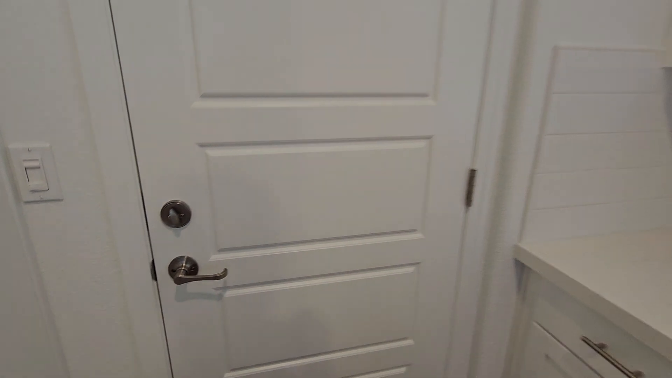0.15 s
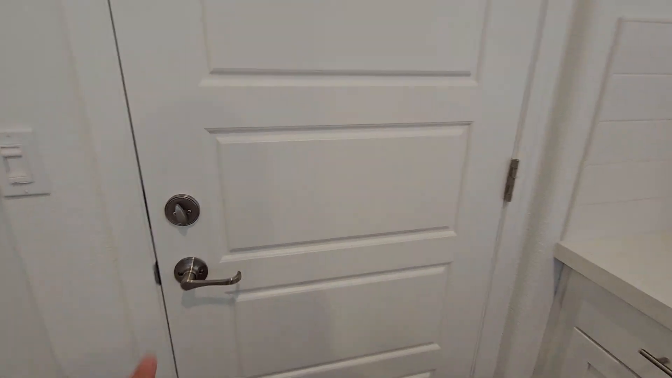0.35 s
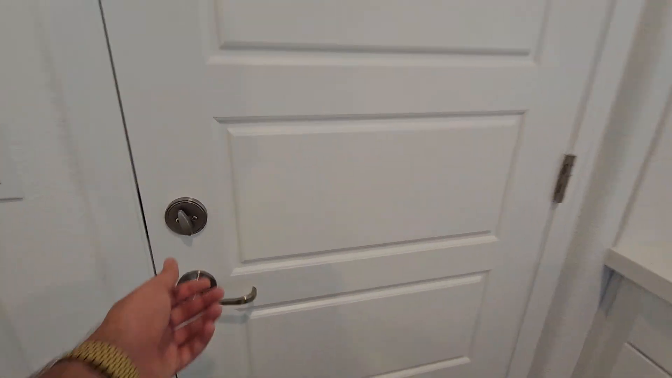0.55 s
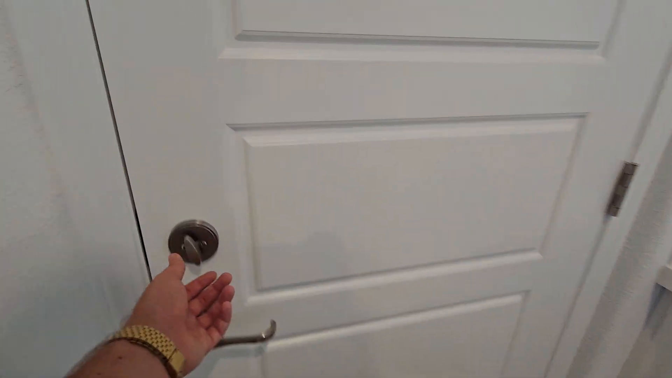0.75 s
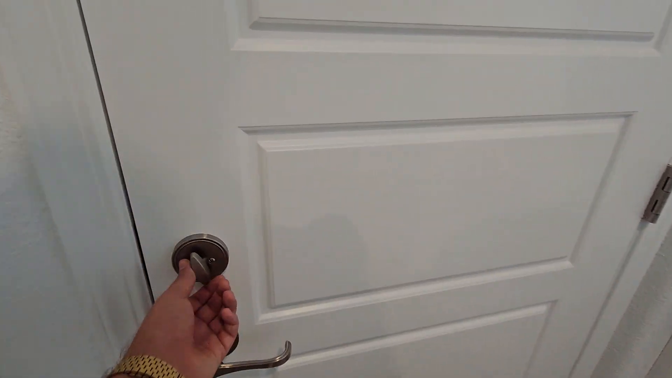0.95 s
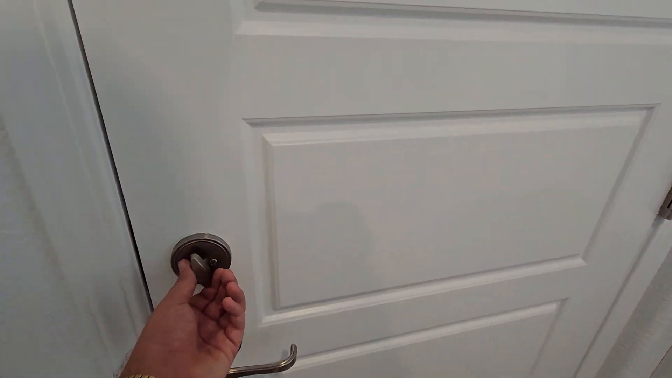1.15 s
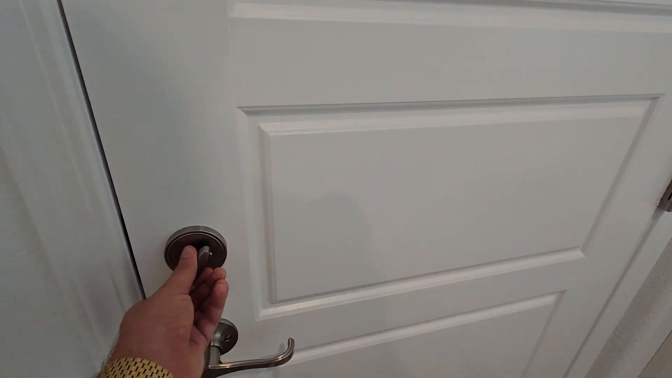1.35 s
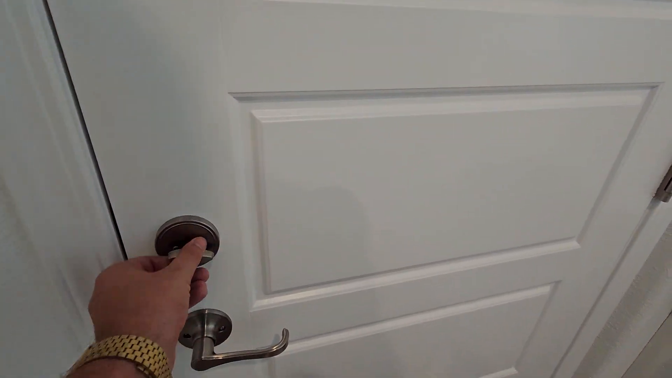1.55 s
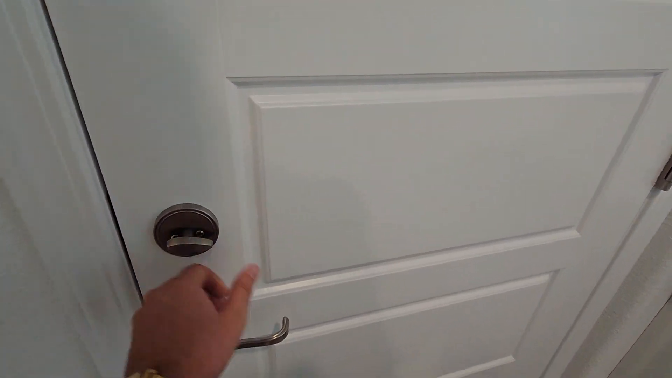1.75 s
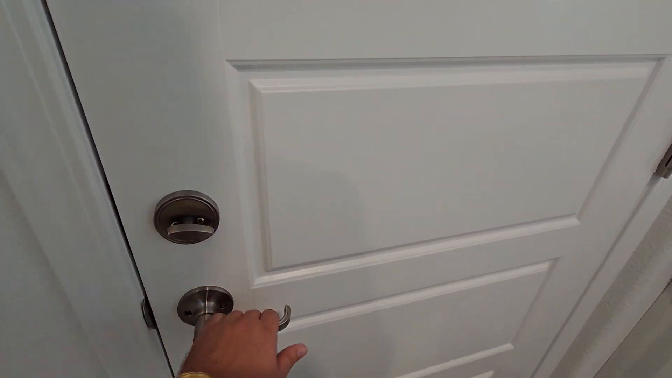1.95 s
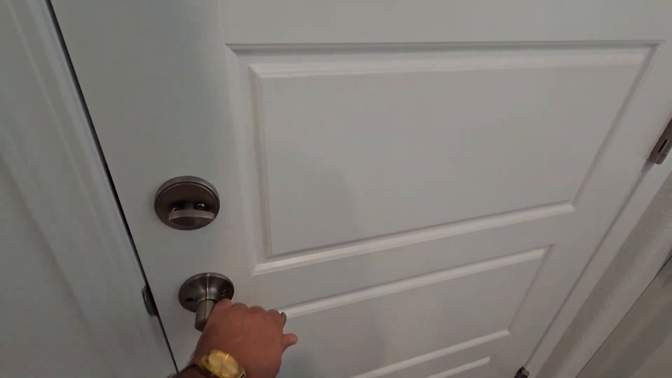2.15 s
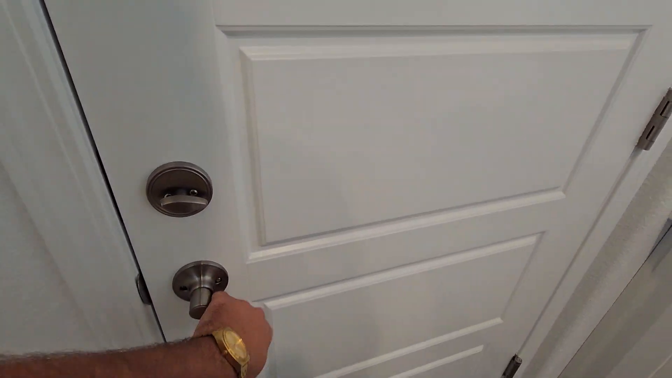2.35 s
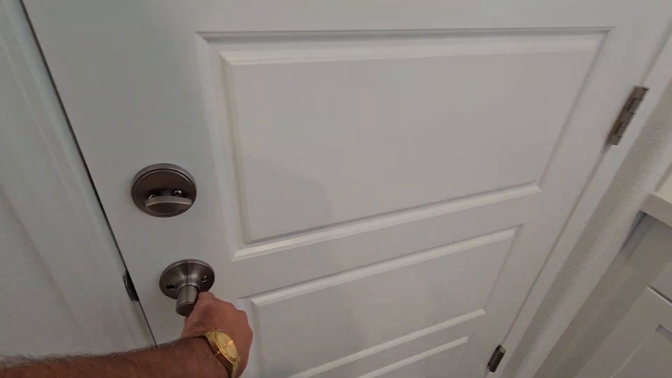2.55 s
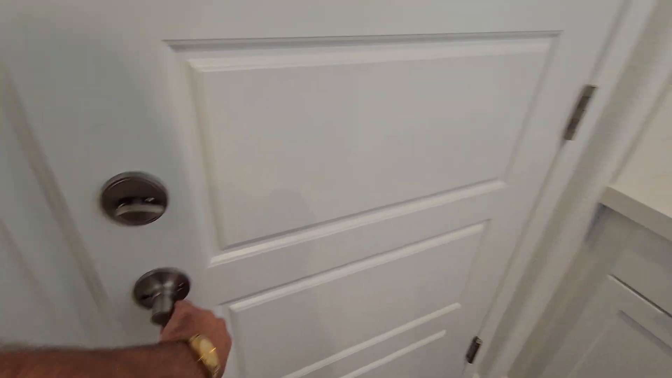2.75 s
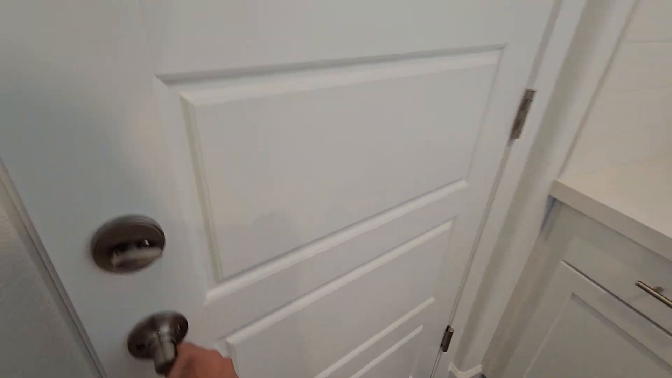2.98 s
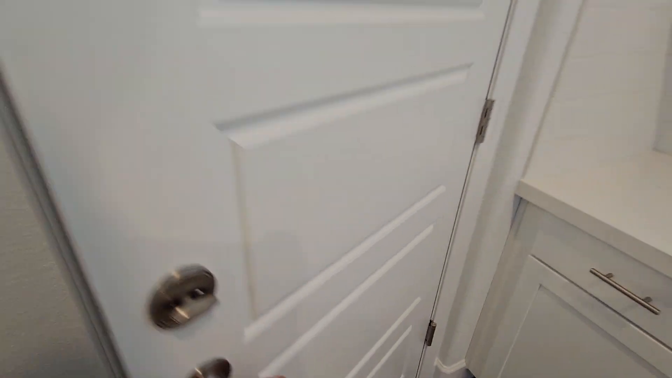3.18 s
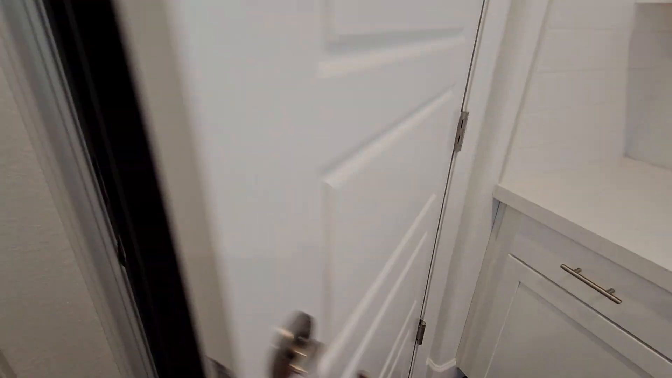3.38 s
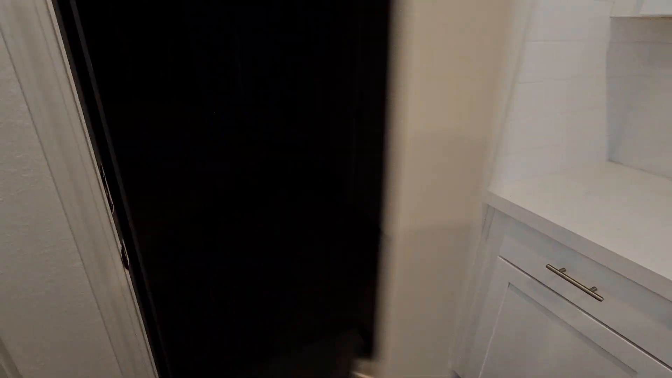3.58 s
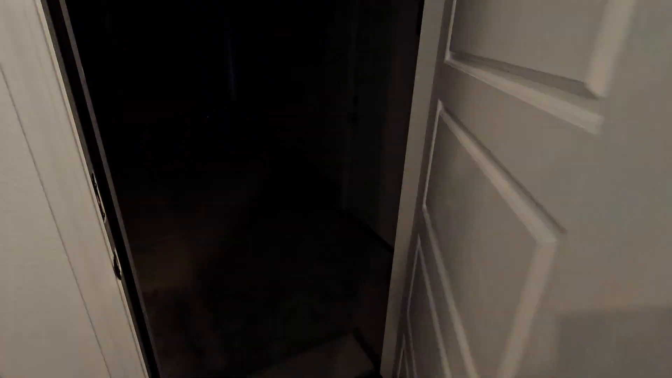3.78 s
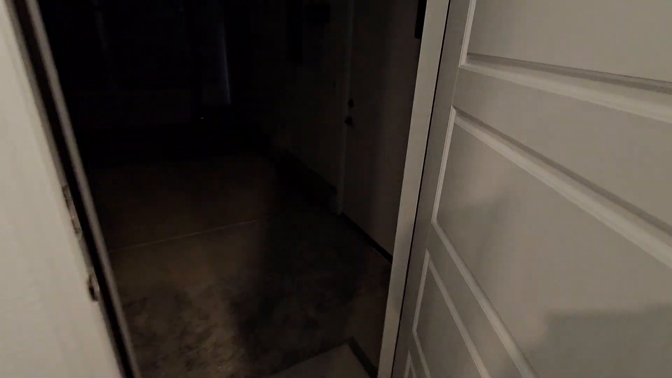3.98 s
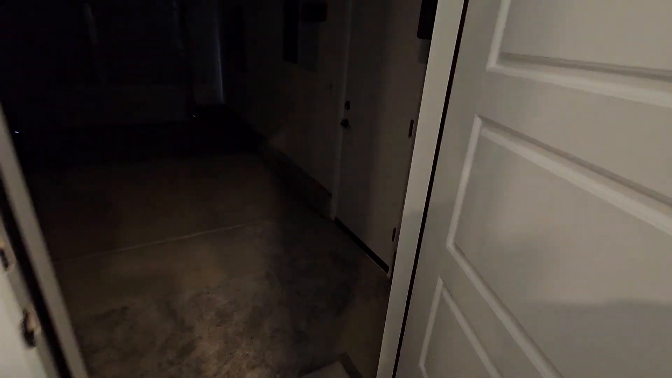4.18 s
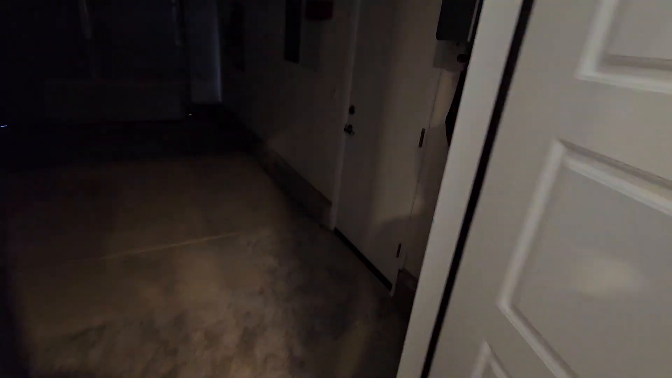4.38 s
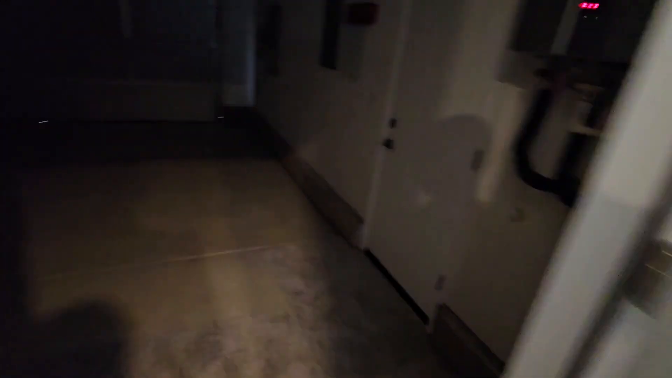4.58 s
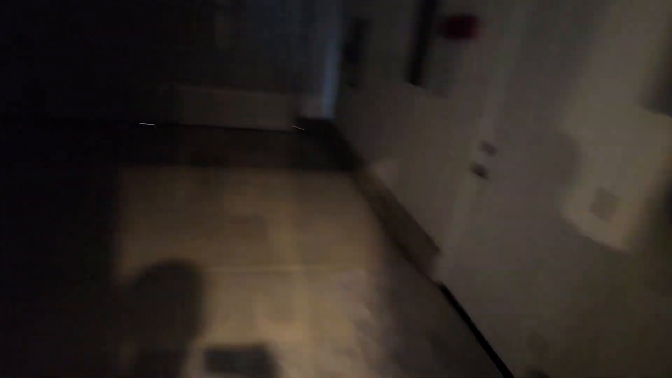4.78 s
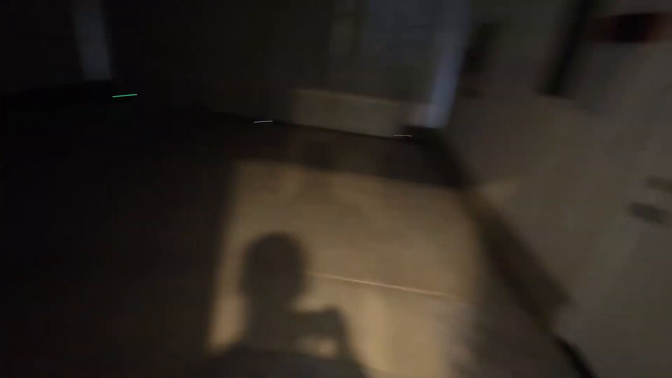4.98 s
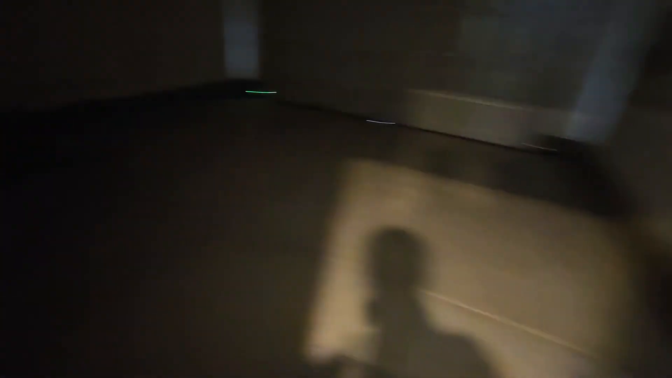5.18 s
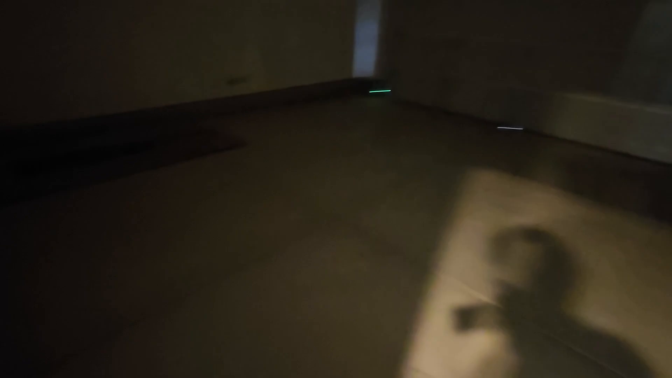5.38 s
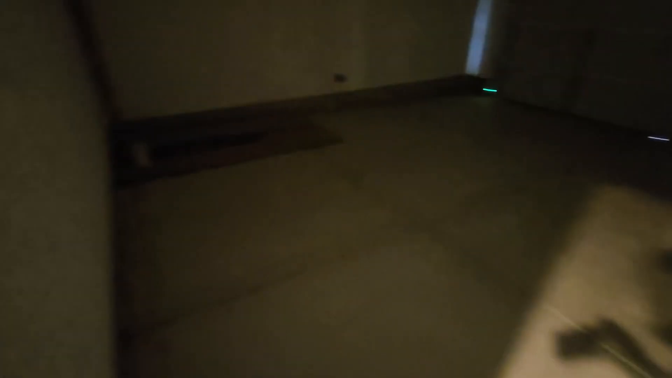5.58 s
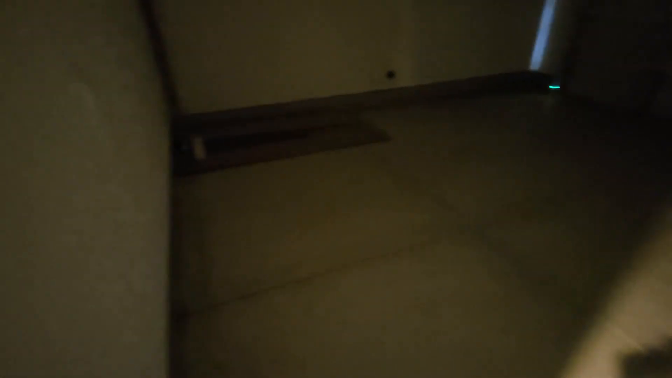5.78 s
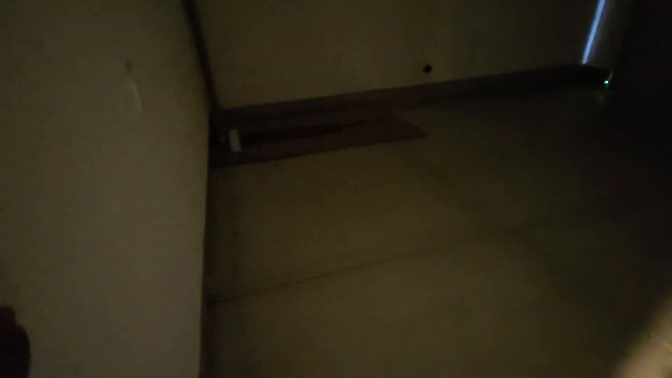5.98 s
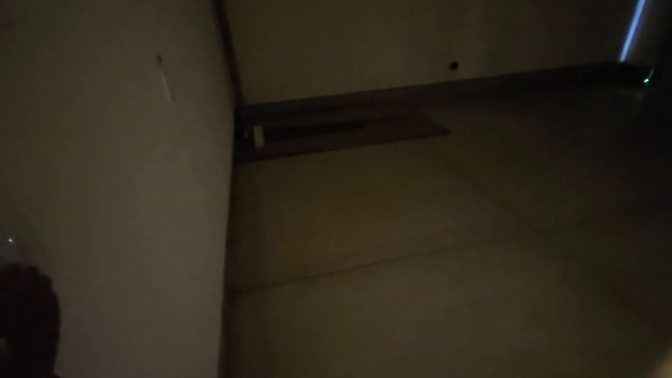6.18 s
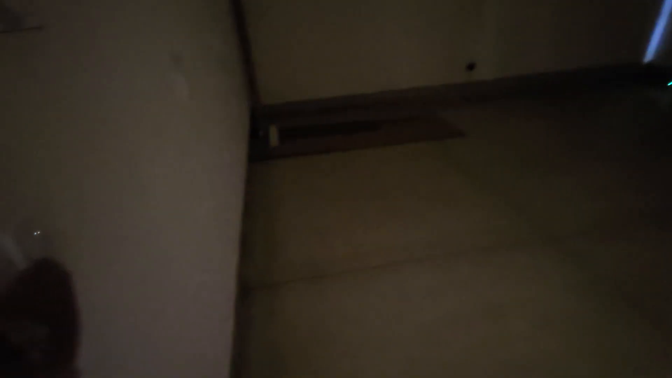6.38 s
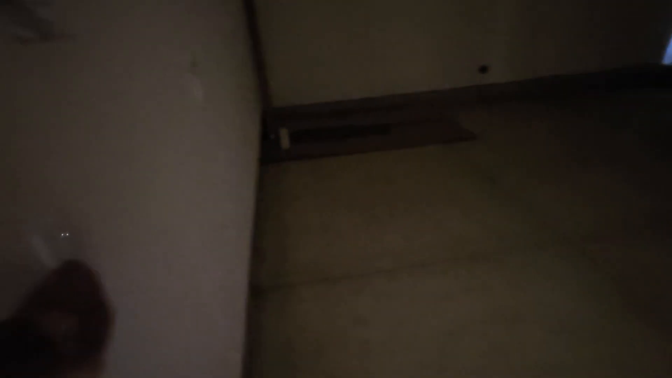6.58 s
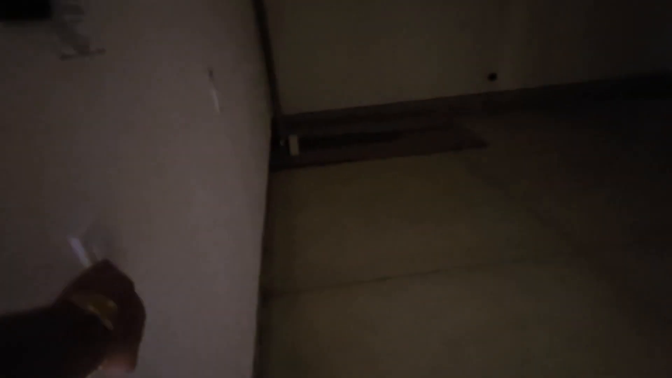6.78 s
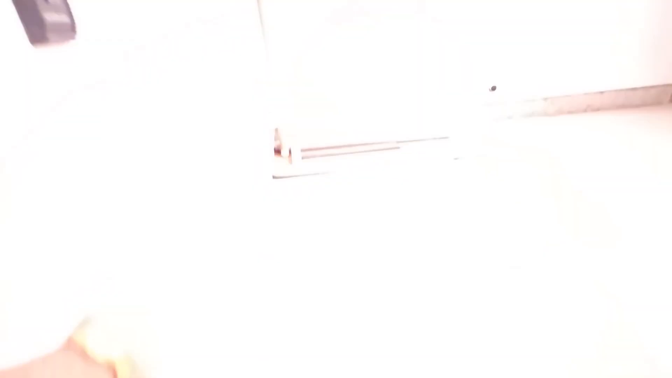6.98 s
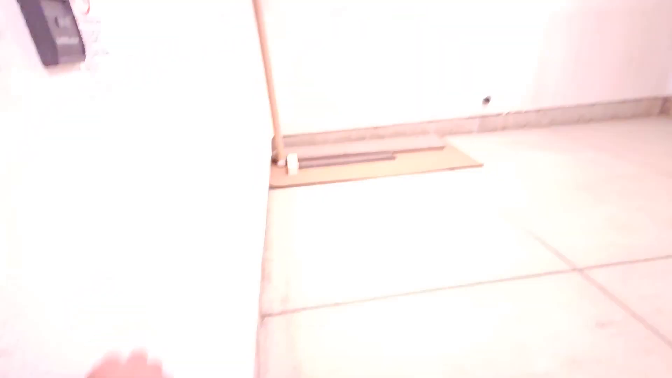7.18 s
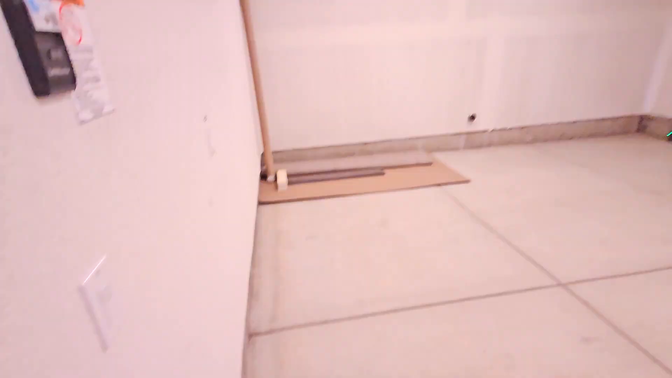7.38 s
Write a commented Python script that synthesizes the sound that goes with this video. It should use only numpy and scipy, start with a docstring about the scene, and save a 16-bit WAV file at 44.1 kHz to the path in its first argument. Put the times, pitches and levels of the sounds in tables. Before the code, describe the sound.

Close, first-person sound in a quiet house with low rumble and mains hum. A hand faintly brushes a lock, the deadbolt rattles and snaps over, then a lever handle clunks down with a woody thud. The door pulls away with a hissing, dragging rub and small latch clicks. Soft steps and cloth swishes lead into a bare, hard-walled garage, ending with small plastic light switch clicks.

```python
"""First a hand brushes a lock over a low house rumble, hum and still air; then a deadbolt turns, a lever pulls the
latch, the door drags off its seal, and someone walks into a bare garage and flicks a light switch.
Metal and plastic contacts are noise bursts plus struck modes, shaded by a head and answered by diffuse hard walls.
Thuds are short low sine swings; brushing, cloth and seal are patchy coloured noise under drawn envelopes;
the background is coloured noise with a steady sine for the hum."""
import sys
import numpy as np
from scipy import signal
from scipy.fft import rfft, irfft, next_fast_len
from scipy.io import wavfile
from scipy.ndimage import uniform_filter1d

SR = 44100
rng = np.random.default_rng(int(sys.argv[2]) if len(sys.argv) > 2 else 0)


def persist_wave(psi):
    """Save psi, clipped to +-1, as 16-bit WAV."""
    counts = np.round(np.clip(psi, -1, 1) * 32767).astype(np.int16)
    wavfile.write(sys.argv[1], SR, np.atleast_2d(counts).T)


N = 328015

# metal contacts of bolt, lever and latch: (time [s], level [dB], centre [Hz], relative treble [dB],
# relative body [dB], decay t60 [s], left-right offset [dB])
LOCK_CONTACTS = [(1.2212, -28.5, 2040, -30.5, -7, 0.14, 3), (1.2275, -17, 1840, -26.5, -20, 0.14, -6),
                 (1.2357, -19.5, 1920, -22, -12.5, 0.092, -2), (1.3694, -36, 1952, -25.5, -9, 0.15, -6),
                 (1.4587, -32.5, 1848, -21.5, -12, 0.069, -6.5), (1.516, -22, 2500, -35, -20, .09, -5),
                 (1.5779, -14, 4100, -10, -21.5, .11, -1.5), (1.5836, 0, 2050, -21.5, -17, 0.095, -1),
                 (2.1986, -32, 2000, -31.5, -3, .06, -2), (2.2776, -34, 2036, -33, -13.5, 0.15, -3.5),
                 (2.3585, -32.5, 2010, -23.5, -6.5, 0.13, -3.5),
                 (2.4069, -16.5, 1930, -8, -2.5, 0.097, 3.5), (2.4276, -3, 2940, -14, -19.5, 0.1, -3),
                 (2.4455, -17.5, 3900, -23, -17.5, 0.074, -6), (2.6879, -24, 1500, -20, 3.5, .06, -2.5),
                 (2.7143, -10.5, 3600, -28, -18, 0.085, -4.5), (2.7286, -19, 4300, -29, -1.5, 0.032, -9.5),
                 (3.0014, -34, 4450, -22, -6, .2, -3.5), (3.2288, -20.5, 2900, -11.5, -15, 0.083, -3.5),
                 (3.3478, -32, 2120, -23, -15, .068, -5), (3.4062, -29.5, 4540, -33, -5.5, .12, 3.5),
                 (3.4116, -23.5, 2030, -24, -16, 0.11, -11), (3.4439, -23.5, 2570, -19, -5.5, 0.089, -4.5)]
# colour of a metal burst: (frequency [Hz], relative level [dB per Hz])
METAL_BURST = [(590, -47), (1000, -10), (1390, -4), (1600, -8), (2050, -10.5), (2350, -13.5), (3510, -10),
               (6090, -13.5), (7260, -6), (9960, -25), (11300, -11.5), (15400, -18), (16500, -26)]
# ringing lock parts: (frequency [Hz], relative level [dB], decay t60 [s])
STEEL_MODES = [(1220, -6.5, 0.09), (1398, -9, 0.082), (1612, 2, 0.12), (1810, -4, 0.18), (1952, -2, .12),
               (2160, -4, .12), (2287, -2.5, .12), (2420, -2, 0.21), (2564, -9, .1), (2870, -6, .1),
               (4222, -6, 0.07), (7500, -14.5, .04)]


def lock():
    """Bolt, lever and latch: metal hits excite steel modes and knock the door leaf."""
    return contacts(LOCK_CONTACTS, METAL_BURST, STEEL_MODES, ring_db=-18.0, build=0.0017, boom_db=3.5,
                    slack=.002, width=1.25, rise=.0025, wet_db=-31, panel_db=-10)


# small ticks, the light switch last: (time [s], level [dB], centre [Hz], relative treble [dB],
# relative body [dB], decay t60 [s], left-right offset [dB])
TICK_CONTACTS = [(0.6195, -42.5, 3330, -7, -4, 0.008, -19), (0.6612, -51.5, 3140, -3, -10, 0.015, -14),
                 (4.2173, -49, 2920, -20.5, -4, 0.053, -7), (4.4794, -60, 700, -30, 12, .04, -3),
                 (4.5875, -44.5, 2800, -9, -10, .02, -20), (6.465, -56, 4000, -10, -20, .018, -7),
                 (6.4898, -54, 3080, -40, -10, 0.019, -10), (6.542, -24, 2280, -53, -16.5, 0.038, -6),
                 (6.7328, -28, 3760, -54, -6, 0.042, -5), (6.8437, -30, 4270, -36, -11.5, .039, -5),
                 (6.9105, -22.5, 4700, -8.5, -17.5, 0.033, -5.5)]
# colour of a tick's burst: (frequency [Hz], relative level [dB per Hz])
PLASTIC_BURST = [(590, -26.5), (1000, -6.5), (1180, -18.5), (2120, -3.5), (2380, -5.5), (3900, -10),
                 (5110, -7.5), (10300, -29), (12000, -10.5), (13800, -13), (16500, -45)]
# plastic switch plate: (frequency [Hz], relative level [dB], decay t60 [s])
PLATE_MODES = [(743, 8, .05), (2500, -3.5, 0.0094), (3590, 1, .02), (4880, -5.5, 0.0091), (5700, 1, 0.013)]


def ticks():
    """Small ticks and the light switch: bursts excite the short, damped modes of a plastic plate."""
    return contacts(TICK_CONTACTS, PLASTIC_BURST, PLATE_MODES, ring_db=-14.5, build=0.025, boom_db=17.0,
                    slack=0.019, width=1.6, rise=0.00084, wet_db=-36, panel_db=-20)


# door leaf: (frequency [Hz], relative level [dB], decay t60 [s])
PANEL_MODES = [(255.8, -1.5, .2), (329, -10.5, 0.036), (398, -6, 0.31), (461, -4, 0.29), (518, -3, .22),
               (597, -7, 0.13), (761, -21.5, 0.1), (932, -11, .1)]
# the head's shading of near sounds: (frequency [Hz], left-right difference [dB])
HEAD_SHADE = [(100, -2.5), (640, 5.5), (1410, 2.5), (3100, -3), (6000, -5), (9000, 6), (15000, 7.5)]
EAR_LAG = 17  # samples by which the right ear is late
ROOM_SHRINKS = 0.25  # dB of room share lost per dB of a harder, more direct contact


def contacts(rows, spectrum, tuning, ring_db, build, boom_db, slack, width, rise, wet_db, panel_db):
    """Each contact: a noise burst, ringing modes, a knock into the body, then the walls."""
    out = np.zeros((2, N))
    t = np.arange(SR // 4) / SR
    woody = lambda hz: np.exp(-np.log(hz / 600 + 1e-9) ** 2 / 0.78)
    high = lambda hz: amp(along(spectrum, hz)) * (hz > 8500)
    for s, db, centre_hz, treble_db, body_db, t60, pan_db in rows:
        # each contact's modes sit at a slightly different, randomly drawn pitch
        modes = np.array(tuning) * [1 + slack * rng.standard_normal(), 1, 1]
        # each part favours its own range
        hump = lambda hz: amp(-6 * (np.log2(hz / centre_hz + 1e-9) / width) ** 2)
        tone = lambda hz: amp(along(spectrum, hz)) * hump(hz)

        shape = (1 - np.exp(-t / max(rise, 1e-4))) * amp(-60 * t / max(t60, .005))
        shape = shape + 0.55 * amp(-60 * t / 0.0056)  # the first touch cracks
        noise = rng.standard_normal((3, len(t)))
        burst = unit(filtered(noise, tone)) * shape
        treble = unit(filtered(noise, high)) * shape * amp(-60 * t / 0.072)  # treble dies first
        burst += amp(treble_db + 5) * treble

        body = unit(filtered(noise[0], woody))
        knock = amp(body_db - 2.0) * (0.8 * body * shape + amp(panel_db) * ringing(PANEL_MODES, t))
        ring = filtered(ringing(modes, t) * np.sqrt(shape), hump)
        core = 0.072 * burst[0] + amp(ring_db) * ring

        # the head delays and shades one ear and scatters a part
        scatter = 0.33 * burst[1:]
        ears = two_ears(core, EAR_LAG) + scatter + two_ears(knock, EAR_LAG // 2)
        ears = filtered(ears, lambda hz: balance(along(HEAD_SHADE, hz) + pan_db))
        add(out, amp(db) * ears, s)

        bright = lambda hz: tone(hz) * (1 + 3 * peaks(modes, hz)) + amp(treble_db + 13.5) * high(hz)
        wood = lambda hz: amp(body_db + boom_db) * woody(hz) * (1 + 3 * peaks(PANEL_MODES, hz))
        tail = walls(lambda hz: bright(hz) + wood(hz), build)
        # echoes are shaded less
        tail = filtered(tail, lambda hz: balance(0.13 * (along(HEAD_SHADE, hz) + pan_db)))
        add(out, amp(wet_db + db * (1 - ROOM_SHRINKS)) * tail, s)
    return out


def ringing(modes, t):
    """A set of decaying sine modes, struck at new strengths and phases."""
    out = 0
    for hz, db, t60 in modes:
        strength, phase = rng.standard_normal(2)
        out = out + amp(db + 2 * strength - 60 * t / t60) * np.sin(2 * np.pi * hz * t + 2 * phase)
    return out


def peaks(modes, hz):
    """The size of the modes' resonant answer at each frequency."""
    return sum(amp(db) / np.abs(1 + 1j * (hz - c) * t60) for c, db, t60 in modes)


def two_ears(sound, lag):
    """The same sound at the left ear and, lag samples later, at the right."""
    return np.array([sound, np.pad(sound, (lag, 0))[:len(sound)]])


# how long the hard walls ring: (frequency [Hz], decay t60 [s])
WALL_DECAY = [(200, 1.7), (1000, 1.49), (3000, 1.58), (7000, 0.97), (11000, 0.59)]
# colour the walls give back: (frequency [Hz], relative level [dB])
WALL_COLOUR = [(200, -5.5), (800, -4), (1500, -3.5), (7000, 3), (9000, -5), (16000, -6.5)]


def walls(tone, build):
    """A fresh diffuse tail of the given colour; each frequency dies at its own speed."""
    hz, t, z = signal.stft(rng.standard_normal((2, 3 * SR // 2)), SR, nperseg=256)
    # long waves reach both ears alike
    z[1] = np.where(hz[:, None] < 600, 0.78 * z[0] + 0.19 * z[1], z[1])
    swell = 1 - np.exp(-t / build)  # echoes take a moment to build
    fall = amp(along(WALL_COLOUR, hz)[:, None] - 60 * t / along(WALL_DECAY, hz)[:, None])
    tail = filtered(signal.istft(z * swell * fall, SR, nperseg=256)[1], tone)
    return tail / np.std(tail[:, :SR // 10])


# soft blows on door and floor: (time [s], level [dB], pitch [Hz])
BLOWS = [(1.572, -32, 149), (1.999, -40, 73.4), (2.19, -31, 62), (2.385, -26, 270), (2.402, -10.5, 145.3),
         (2.457, -14, 63.3), (2.499, -20.5, 29), (2.583, -23, 42), (2.592, -26, 140), (2.679, -31, 211),
         (2.719, -24, 26.2), (3, -36, 44.6), (3.25, -36, 36.6), (3.289, -36, 45.4), (4.022, -30, 45),
         (4.128, -35.5, 73.2), (4.196, -29, 72.7), (4.222, -30, 70), (4.359, -35, 46.4), (4.395, -38, 130),
         (4.468, -28.5, 65.4), (4.5, -29, 72), (4.676, -39.5, 66), (5.039, -35, 50), (5.126, -37, 75),
         (5.208, -37, 58.7), (5.341, -47, 51.1), (5.897, -40.5, 45.3)]
# which side low sounds favour, also used by the house: (time [s], left-right difference [dB])
LOW_LEAN = [(0, 1), (2.9, .5), (3.9, 2.5), (4.5, 5), (5.2, 1.5), (5.5, 1), (7.44, 0)]
THUD_T60_S, THUD_RISE_S = .18, .006


def thuds():
    """Soft blows: a short low sine swing at its own pitch."""
    out = np.zeros((2, N))
    t = np.arange(SR // 2) / SR
    for s, db, hz in BLOWS:
        turn = 2 * np.pi * hz * t + [[.15], [-.15]]  # the ears differ a little in phase
        swing = np.sin(turn) * (1 - np.exp(-t / THUD_RISE_S)) * amp(-60 * t / THUD_T60_S)
        lean = balance(np.interp(s, *np.transpose(LOW_LEAN)))
        add(out, amp(db) * lean * swing, s - .004)  # starts early to leave room for the rise
    return out


# strokes of a hand reaching for the lock: (peak time [s], peak level [dB], 20 dB rise [s], 20 dB fall [s]);
# the sign of a rise or fall is ignored
HAND_STROKES = [(0.0, -67.5, .02, .5), (.25, -74.5, -0.1, .25), (.42, -73, .04, .8), (.6, -74, 0.25, .03),
                (.92, -54.5, .22, .22), (1.07, -69, -0.1, .2)]
# swishes of cloth and soles while walking: (peak time [s], peak level [dB], 20 dB rise [s], 20 dB fall [s])
WALK_STROKES = [(4.251, -70.5, 0.022, 0.14), (4.437, -64, .11, 0.43), (4.58, -64, 0.084, 0.14),
                (4.85, -72, 0.13, 0.91), (5.066, -55, 0.08, 0.4), (5.284, -61, 0.17, 0.27),
                (5.472, -58.5, 0.1, 0.33), (5.686, -62, 0.18, 0.17), (5.937, -62, 0.042, 0.32)]
# lever and seal rubbing: (time [s], hiss level [dB], fizz level [dB], drag level [dB])
SEAL_LEVELS = [(1.97, -70, -95, -62), (2.05, -60, -92, -53), (2.13, -62, -90, -66), (2.2, -52, -70, -46),
               (2.25, -62, -84, -51), (2.37, -52.5, -74, -49), (2.43, -37, -50, -33), (2.5, -39, -66, -43),
               (2.62, -41, -57, -44), (2.7, -42, -57, -44), (2.75, -41, -70, -38), (2.81, -49, -75, -46),
               (2.99, -52, -72, -56), (3.02, -50, -62, -44), (3.12, -49, -68, -47), (3.24, -52, -58, -51),
               (3.32, -53, -68, -54), (3.44, -56.5, -62, -51), (3.66, -61.5, -72, -59),
               (3.75, -71, -97, -60), (3.9, -76.5, -104, -66)]
# colours of hand on lock, cloth, seal hiss, top fizz and low drag: (frequency [Hz], relative level [dB per Hz])
SKIN_COLOUR = [(530, -48), (900, -17), (1450, -11.5), (1660, -20), (2650, -4.5), (2900, -6), (6480, -12),
               (7100, -9), (10000, -40.5), (13000, -56.5), (22000, -120)]
CLOTH_COLOUR = [(410, -46), (700, -3), (740, -13), (1150, -1.5), (1630, -1.5), (2660, -0.5), (4250, 0.5),
                (7000, -2.5), (8650, -23), (10000, -29), (13000, -43), (22000, -120)]
HISS_COLOUR = [(530, -27), (900, -4), (1370, -6.5), (3320, -3.5), (4250, -2.5), (7400, -11.5), (8730, -39),
               (10500, -55.5), (13600, -64.5), (22000, -120)]
FIZZ_COLOUR = [(5590, -39.5), (9500, -12), (11600, 3), (15100, -5), (15750, -8), (16000, -35), (16500, -46)]
DRAG_COLOUR = [(120, -59.5), (200, -5), (291, -2.5), (402, -5), (554, -2), (1020, -19.5), (1200, -25),
               (1560, -43), (2640, -120)]
SHEEN_DB, SHEEN_QUICKER = -10, 1.3  # treble of a stroke: level under it, and how much faster it comes and goes


def friction():
    """Rubbing as patchy noise: hand on lock, cloth and soles, and the seal's hiss, fizz and drag."""
    hiss, fizz, drag = curves(SEAL_LEVELS)
    hand = strokes(HAND_STROKES) * rush(SKIN_COLOUR, patchy_db=2.0)
    cloth = strokes(WALK_STROKES) * rush(CLOTH_COLOUR, patchy_db=1.3)
    seal = hiss * rush(HISS_COLOUR, patchy_db=1.8) + drag * rush(DRAG_COLOUR, patchy_db=3.0)
    sheen = amp(SHEEN_DB) * strokes(HAND_STROKES + WALK_STROKES, SHEEN_QUICKER)
    return hand + cloth + seal + (sheen + fizz) * rush(FIZZ_COLOUR, patchy_db=2.1)


def strokes(rows, quicker=1):
    """Each stroke swells to its peak and dies away, evenly in dB."""
    t = np.arange(N) / SR
    out = 0
    for s, db, rise, fall in rows:
        away = np.maximum((s - t) / abs(rise), (t - s) / abs(fall))
        out = out + amp(db - 20 * quicker * away)
    return out


# house and body movement: (time [s], level [dB])
RUMBLE_LEVEL = [(0, -53.5), (.74, -55.5), (1.62, -50), (1.99, -54), (2.24, -44), (2.6, -30.5), (2.78, -42),
                (3.09, -49), (3.19, -57.5), (3.56, -49.5), (3.75, -56.5), (4.2, -43.5), (4.62, -50.5),
                (5.05, -57.5), (5.22, -52.5), (5.59, -59.5), (5.94, -56.5), (7.44, -56)]
# mains hum: (time [s], level [dB])
HUM_LEVEL = [(0, -56), (.6, -50), (2.3, -48), (3.85, -57), (5.03, -53), (5.47, -52.5), (7.44, -54)]
# a narrow appliance whine: (time [s], level [dB])
WHINE_LEVEL = [(0, -77.5), (2, -80.5), (4, -74.5), (7.44, -87.5)]
# colours of deep rumble, upper rumble and still air: (frequency [Hz], relative level [dB per Hz])
DEEP_COLOUR = [(8.8, -34.5), (15, -10.5), (59, 6.5), (73, 0.5), (97, -19), (110, -1.5), (140, -23),
               (240, -120)]
LOW_COLOUR = [(65, -34.5), (110, 2.5), (145, 4.5), (239, -2), (274, -2), (413, -16), (643, -22), (700, -23),
              (910, -29), (1540, -120)]
AIR_COLOUR = [(210, -31), (350, -8.5), (446, 0), (625, -7), (1330, -8.5), (1470, -8), (2800, -15),
              (3140, -9), (3400, -13.5), (6480, -19.5), (8660, -60.5), (10200, -102), (11400, -26),
              (12500, -33), (15700, -32), (15950, -70)]
AIR_DB = -68
REST_DB = -55  # deep rumble at rest
LOW_DB, LOW_FOLLOWS = -55, 0.55  # the upper rumble: level at rest, dB per dB of movement
GARAGE_S, GARAGE_DB = 4.88, -6  # past the doorway the upper rumble is this much weaker


def house():
    """Noise rumble that moves in level, a sine mains hum, a thin noise whine and still air."""
    t = np.arange(N) / SR
    deep, = curves(RUMBLE_LEVEL)
    hum_level, = curves(HUM_LEVEL)
    whine_level, = curves(WHINE_LEVEL)
    doorway_db = GARAGE_DB * np.clip((t - GARAGE_S) / 0.4, 0, 1)
    low = amp(LOW_DB + doorway_db) * (deep / amp(REST_DB)) ** LOW_FOLLOWS
    rumble = deep * rush(DEEP_COLOUR, patchy_db=1.85) + low * rush(LOW_COLOUR, patchy_db=0.6)
    hum = hum_level * np.sin(2 * np.pi * 59.5 * t)
    lean = balance(np.interp(t, *np.transpose(LOW_LEAN)))
    whine = whine_level * rush([(2900, -50), (3130, 0), (3360, -50)], patchy_db=.4)
    air = amp(AIR_DB) * rush(AIR_COLOUR, patchy_db=.6)
    return (rumble + hum) * lean + whine + air


# how alike the two ears' noise is: (frequency [Hz], left-right correlation [-1 to 1])
EAR_LIKENESS = [(60, 0.99), (180, 0.89), (550, 0.76), (1650, -0.26), (4970, -0.045), (15000, 0.38)]


def rush(spectrum, patchy_db):
    """Stereo noise of rms 1 with time-frequency patches of random gain, alike in the bass."""
    z = signal.stft(rng.standard_normal((2, N)), nperseg=512)[2]
    field = uniform_filter1d(rng.standard_normal(z.shape[1:]), size=6, axis=0)
    field = uniform_filter1d(field, size=6, axis=1)
    pair = signal.istft(z * amp(patchy_db * unit(field)), nperseg=512)[1][:, :N]
    # the angle shares the power between mid and side
    angle = lambda hz: np.arccos(np.clip(along(EAR_LIKENESS, hz), -1, 1)) / 2
    share = lambda hz: amp(along(spectrum, hz)) * [np.cos(angle(hz)), np.sin(angle(hz))]
    mid, side = filtered(pair, share)
    return unit(np.array([mid + side, mid - side]))


def amp(db):
    """Amplitude gain of a level in dB."""
    return 10 ** (np.asarray(db) / 20)


def balance(db):
    """Left and right gains that differ by db, half on each side."""
    return amp(np.array([[.5], [-.5]]) * db)


def unit(x):
    """Scales to rms 1."""
    return x / np.sqrt(np.mean(x ** 2) + 1e-20)


def along(points, hz):
    """Reads (frequency [Hz], value) points on a log frequency axis."""
    f, v = np.transpose(points)
    return np.interp(np.log(hz + 1), np.log(f + 1), v)


def curves(rows):
    """Gains per sample for each dB column; -140 dB outside the table."""
    s, *cols = np.transpose(rows)
    t = np.arange(N) / SR
    return [amp(np.interp(t, s, c, left=-140, right=-140)) for c in cols]


def filtered(x, response):
    """Shapes the spectrum of x by a response of frequency."""
    n = x.shape[-1]
    m = next_fast_len(n + 4096)
    return irfft(rfft(x, m) * response(np.fft.rfftfreq(m, 1 / SR)), m)[..., :n]


def add(out, sound, s):
    """Mixes a stereo sound in at time s."""
    seat = out[:, round(s * SR):][:, :sound.shape[1]]
    seat += sound[:, :seat.shape[1]]


def scene():
    """All layers, from the lock to the house behind it."""
    return lock() + ticks() + thuds() + friction() + house()


TOP_HZ = 16600


def record(dry):
    """Nothing is kept above the band limit."""
    return filtered(dry, lambda hz: hz < TOP_HZ)


dry = scene()
out = record(dry)
persist_wave(out)
```